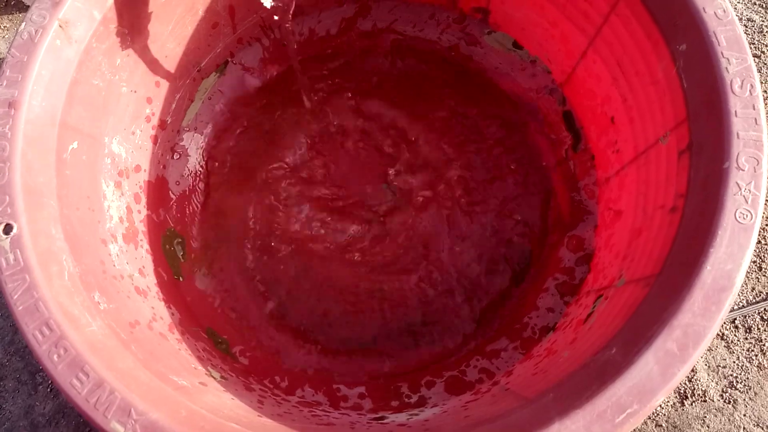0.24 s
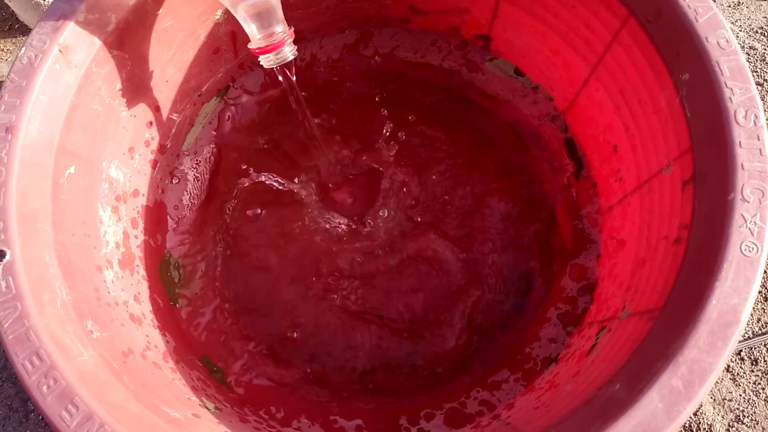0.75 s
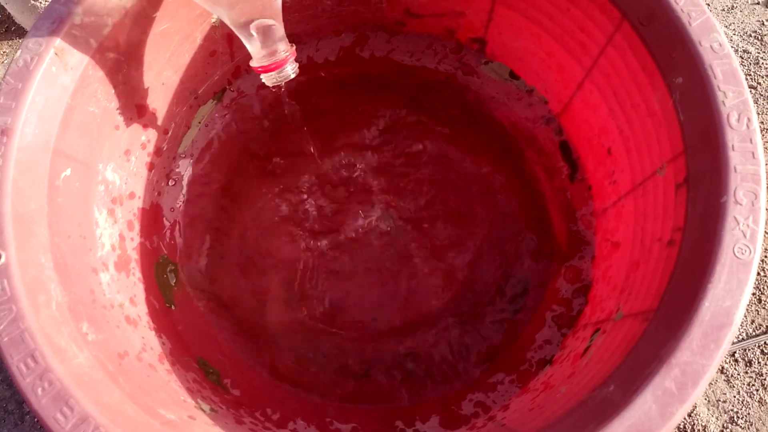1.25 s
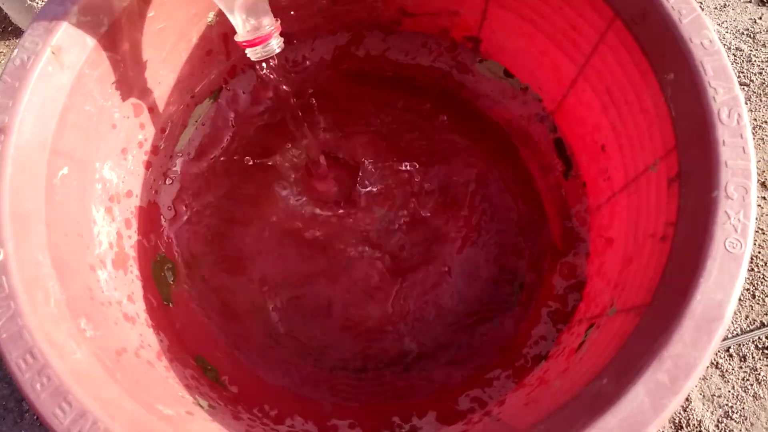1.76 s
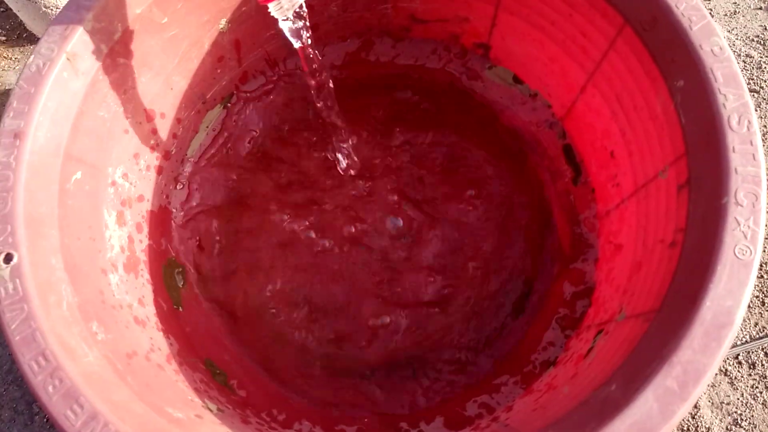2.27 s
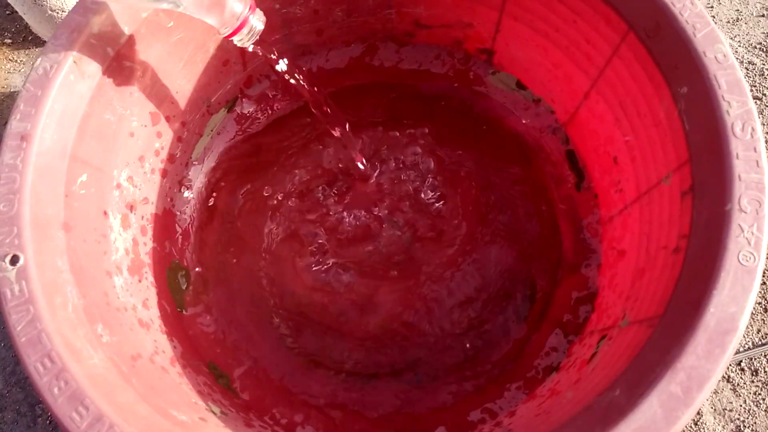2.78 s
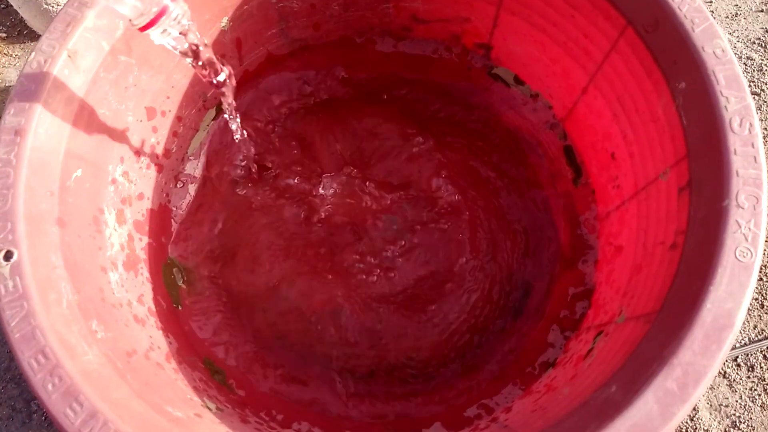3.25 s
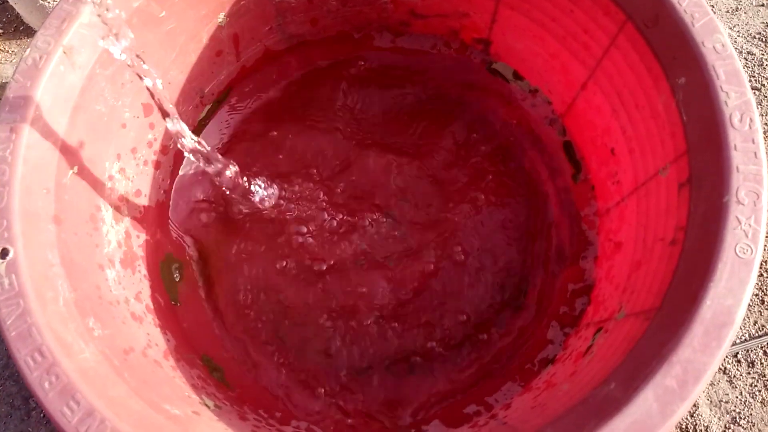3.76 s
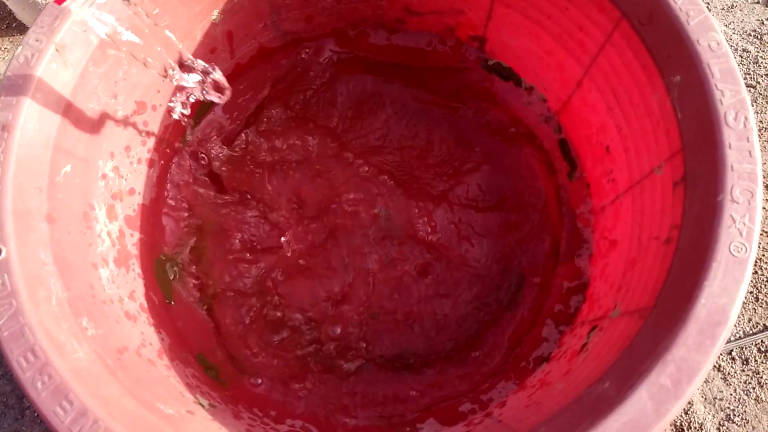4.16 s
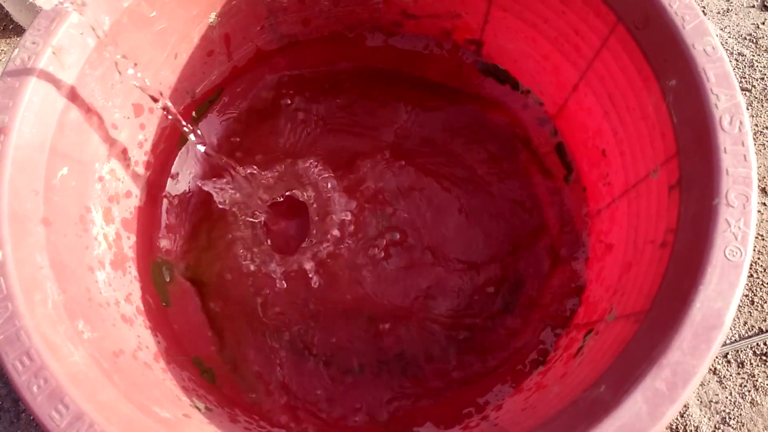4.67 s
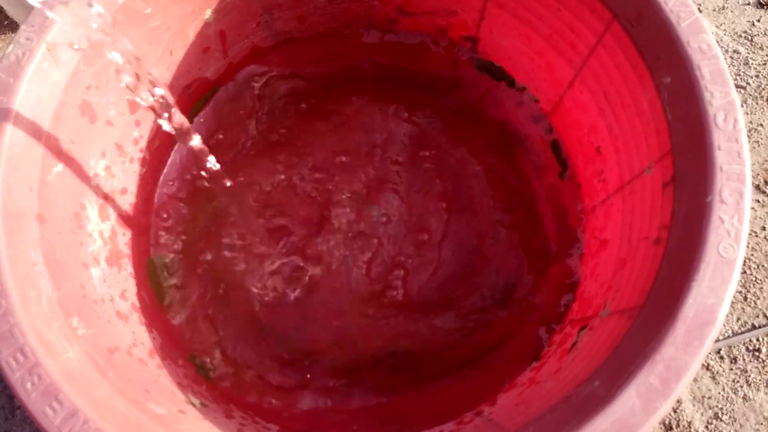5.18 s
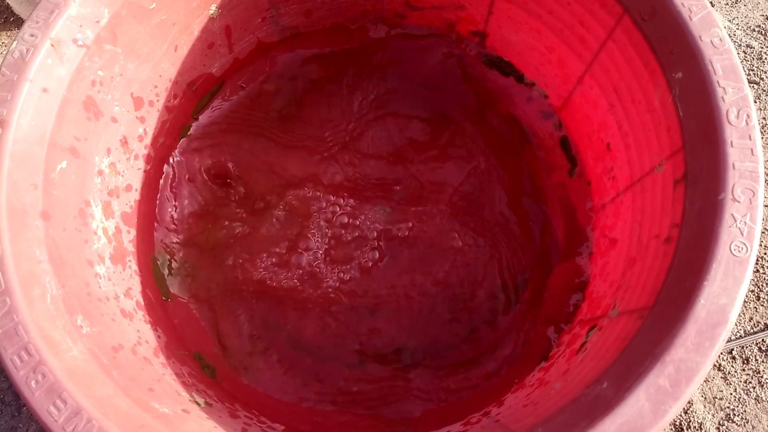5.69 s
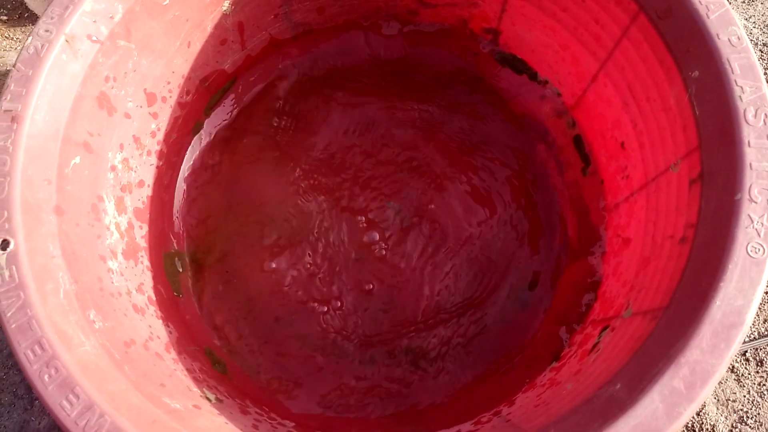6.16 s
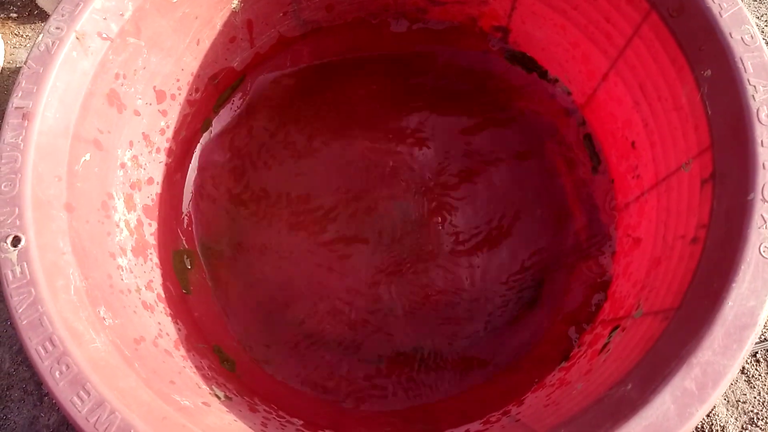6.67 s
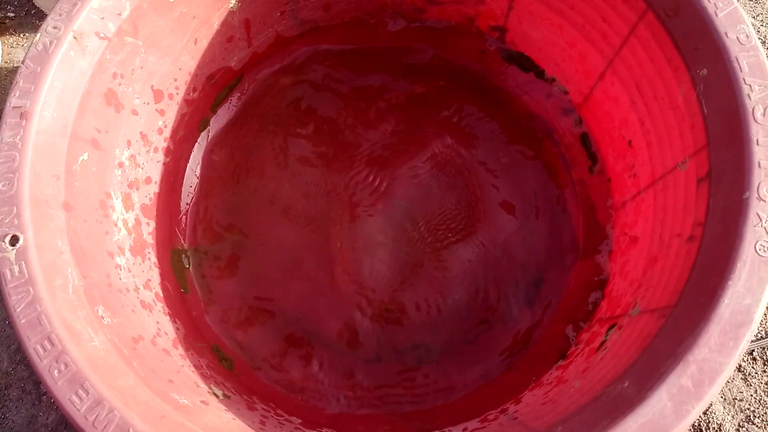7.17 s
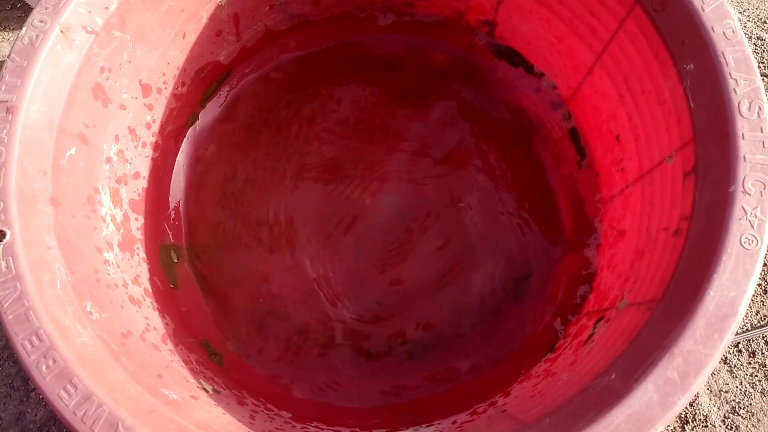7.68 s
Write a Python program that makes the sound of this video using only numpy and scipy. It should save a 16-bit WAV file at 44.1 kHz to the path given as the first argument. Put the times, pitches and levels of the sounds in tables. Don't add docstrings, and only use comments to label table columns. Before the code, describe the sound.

Water glugs from a plastic bottle into a part-full plastic basin, splashing and bubbling, then drips to a stop before one loud hard knock.

```python
import sys
import numpy as np
from scipy import signal
from scipy.fft import rfft, irfft
from scipy.io import wavfile
from scipy.ndimage import uniform_filter1d, map_coordinates

SR = 44100
rng = np.random.default_rng(int(sys.argv[2]) if len(sys.argv) > 2 else 0)


def decibels_to_gain(level_db):
    exponent = np.asarray(level_db, float) / 20
    return 10 ** exponent


def master_out(mix):
    frames = np.transpose(np.atleast_2d(mix))
    ceiling = np.clip(frames, -1, 1)
    pcm = np.round(ceiling * 32767).astype(np.int16)
    wavfile.write(sys.argv[1], SR, pcm)


N = 349536
GRAIN = 4096

# (time [s], peak level [dB], pitch [Hz])
PLOPS = [(0.134, -32, 1370), (0.215, -38, 1110), (0.313, -38.5, 1095), (0.403, -39.5, 1090),
         (0.562, -33, 910), (0.665, -35, 970), (0.949, -36, 1196), (1.118, -37.5, 1070),
         (1.822, -39.5, 825), (2.261, -26.5, 1012), (2.425, -28.5, 1310), (2.641, -35, 1450),
         (2.712, -19, 900), (2.781, -38.5, 580), (3.046, -15.5, 586), (3.261, -33.5, 560),
         (3.389, -24.5, 642), (3.892, -33.5, 1530), (4.235, -34.5, 1070), (4.446, -28.5, 1164),
         (4.755, -30.5, 1290), (4.932, -38, 1490), (5.037, -35.5, 1160), (5.5275, -16.5, 804),
         (5.711, -34, 1083), (6.078, -16, 610), (6.359, -43, 720),
         (0.092, -42.5, 1900), (0.2432, -37.5, 2730), (0.8013, -37.5, 2140), (1.1476, -37.5, 2090),
           (1.4117, -39.5, 1870), (1.4641, -39.5, 1910), (2.0254, -30.5, 1930), (2.1161, -40.5, 1880),
           (2.3228, -39, 2640), (2.6269, -27, 2970), (2.679, -31, 2230), (3.0458, -18.5, 2330),
           (3.05, -17.5, 1660), (3.1804, -25.5, 1920), (3.1977, -28.5, 2145), (3.684, -35.5, 2120),
           (3.4868, -33.5, 1990), (3.5195, -29, 2290), (3.586, -27.5, 2310), (3.9247, -31, 2820),
           (4.1256, -33.5, 2850), (4.279, -31, 2820), (4.3091, -32, 1970), (4.6617, -29, 1930),
           (4.7202, -23, 2220), (4.8522, -30, 1890), (5.0626, -27.5, 2830), (5.447, -27.5, 2640),
           (5.5313, -26, 1990), (6.0779, -31.5, 1735), (6.359, -36.5, 2350),
         (0.6377, -41, 930), (0.8003, -44, 980), (0.8925, -44, 507), (0.9709, -46, 870),
           (1.0697, -45, 1140), (1.36, -44.5, 980), (1.4095, -44, 1460), (3.47, -42.5, 700),
           (3.047, -21, 1100), (2.2358, -42, 955), (2.4489, -38.5, 1350), (2.6836, -40, 646),
           (2.8199, -38, 840), (3.535, -39, 645), (3.7907, -40, 550), (3.8554, -39, 1500),
           (3.9382, -35, 1450), (4.14, -38, 1376), (4.431, -35, 1350), (4.9616, -39.5, 1364),
           (5.278, -39.5, 1380), (5.4804, -39, 1270),
         (0.2115, -37, 1960), (3.608, -34, 2700), (1.1149, -39.5, 1800), (0.707, -39, 2860),
         (1.5041, -39.5, 1850), (5.108, -34.5, 2620), (1.9001, -42.5, 2830), (3.746, -40, 2020),
         (2.5326, -41, 2590), (2.735, -36, 2000), (2.834, -36.5, 2150), (3.0926, -33, 2090),
         (3.305, -39.5, 2100), (3.386, -41, 1660), (3.764, -37.5, 2500), (4.0906, -39, 2610),
         (4.1645, -37.5, 2260), (4.2308, -34, 1586), (4.325, -31.5, 2520), (4.381, -42, 2000),
         (4.3956, -34, 2800), (4.5, -34.5, 2600), (4.643, -33, 2580), (4.963, -39.5, 1655)]


def plops():
    out = np.zeros(N)
    t = np.arange(GRAIN // 2) / SR
    rows = PLOPS
    smack = coloured([(300, 0.5), (600, 9.5), (2600, -0.5), (4500, -12.5), (9000, -76)], N + GRAIN)
    floor_hz, floor_db = 360, -11
    for (s, peak_db, hz), luck in zip(rows, rng.random((len(rows), 3, 10))):
        force = np.clip((peak_db + 39.0) / 30, 0, 1)
        above_oct = 0.313 + force * max(np.log2(2700 / hz), 0)
        cloud = cluster(hz, 0.022 - 0.017 * force, luck, below_oct=0.347, above_oct=above_oct,
                        cycles=64.0, climb=0.05, mates_db=-1.0)
        slap = puff(smack, s, hz, 1.0, skirt_db=-20.5 + 3.4 * force)
        slap = slap * swell(t, 0.009 - 0.00975 * force ** 0.5, 0.038 - 0.0068 * force)
        slap = signal.sosfilt(signal.butter(4, 0.55 * hz, "high", fs=SR, output="sos"), slap)
        splash = (cloud + decibels_to_gain(0.5) * slap) * lozenge(t, 0.0025 * (1.05 - force), 0.016 + 0.015 * force)
        pinched = force ** 2 * decibels_to_gain(5.0) * bubble(t, hz, 24.0, 0.05, rise_cycles=0.68)
        floor = decibels_to_gain(floor_db - 10 * force) * bubble(t, floor_hz, 30.0, 0)
        add(out, s, splash + pinched + floor, peak_db + 0.6)
    return out


# (frequency [Hz], level per Hz [dB])
SPRAY_COLOUR = [(700, -27), (1470, -6), (2710, -2), (3320, -10), (4850, -10), (7030, -9.5), (9880, -7),
                (13500, -11), (14900, -4), (15750, 0.5), (16200, -22.5)]
# (time [s], peak level [dB], centre [Hz])
SLAPS = [(0.1887, -38, 6000), (0.3657, -39.5, 4970), (0.6525, -33.5, 6080), (0.706, -32, 6350),
         (1.6872, -31, 6700), (1.7063, -34, 4130), (1.9734, -41, 5400), (2.257, -27.5, 6680),
         (2.3226, -28, 5870), (2.5266, -32.5, 6250), (2.678, -32, 6240), (2.784, -33, 5940),
         (2.8709, -31.5, 4120), (3.19, -30, 5120), (3.3604, -28.5, 5850), (3.455, -22.5, 4950),
         (3.468, -37, 4600), (3.698, -28, 4390), (3.8578, -37, 3550), (3.925, -30.5, 4410),
         (4.047, -27.5, 4070), (4.1135, -30.5, 6780), (4.14, -32.5, 6030), (4.4037, -33.5, 7100),
         (4.72, -31, 3480), (4.8947, -29, 5770), (4.93, -36, 5130), (5.4067, -33.5, 6070),
         (5.528, -30.5, 4270), (5.6007, -36.5, 3930)]
# (time [s], peak level [dB], centre [Hz])
SPLASHES = [(0.0923, -34, 9900), (0.1345, -27.5, 8400), (0.239, -42, 8100), (0.6449, -36, 15500),
            (0.707, -27.5, 14470), (0.8008, -39, 7340), (0.9466, -26, 8560), (1.1324, -34.5, 8520),
            (1.11, -43, 4600), (1.412, -46.5, 4640), (1.3507, -38, 9800), (1.563, -41, 10000),
            (1.803, -41, 7420), (1.8627, -42.5, 9970), (1.708, -26, 10340), (1.9754, -28, 7560),
            (2.0246, -25, 15500), (2.1945, -36, 10500), (2.4096, -37, 15300), (2.599, -43, 10250),
            (2.8435, -33, 9100), (2.9324, -41.5, 8200), (3.275, -32, 9630), (3.6044, -26, 9700),
            (3.729, -36.5, 9840), (3.8196, -36, 7560), (4.0193, -38, 10800), (4.2, -37, 9780),
            (4.5425, -30.5, 7600), (4.6427, -25.5, 9200), (4.7006, -34.5, 9300), (4.8695, -40, 15900),
            (4.9864, -35, 10140), (5.036, -35, 8550), (5.7108, -42, 7600),
            (0.432, -45.5, 4700), (2.0246, -33, 3870), (2.4095, -37.5, 6030), (2.5499, -38, 6240),
        (2.641, -35.5, 6000), (2.9316, -42, 4150), (3.2767, -39, 3700), (3.6514, -34, 4860),
        (3.8778, -32, 3860), (3.8904, -39, 5580), (5.368, -39, 4800), (5.331, -40.5, 4500),
        (4.2476, -38, 3900), (4.3065, -33, 6230), (4.328, -39, 4250), (4.4185, -35.5, 4030),
        (4.482, -38, 5940), (4.6023, -35.5, 7080), (4.8515, -38, 6800), (4.869, -32.5, 6370),
        (5.441, -35.5, 4160), (5.4873, -38, 5030),
            (0.2056, -38.5, 10750), (2.423, -32.5, 15630), (2.6283, -35, 10220), (3.166, -38, 8000),
          (3.4677, -27, 9440), (3.909, -30, 9540), (3.9593, -42, 15220), (4.0571, -34, 8340),
          (4.088, -39, 8590), (4.1242, -39, 8930), (4.3248, -45, 9730), (4.4825, -27.5, 15610),
          (4.498, -34, 7800), (4.5204, -44, 9810), (4.5741, -33, 15210), (4.657, -31.5, 7900),
          (4.714, -27, 15640), (5.012, -36.5, 8270), (5.1584, -40, 10000), (5.1743, -36, 9230),
          (5.188, -39, 10000), (5.3411, -43, 8320), (5.3853, -43, 10020), (5.4086, -36, 7800),
          (1.267, -41.5, 6200)]
# (time [s], peak level [dB], centre [Hz])
LAST_DRIPS = [(5.624, -46, 4460), (5.71, -32, 3370), (5.7885, -50.5, 6010), (6.063, -47, 9840),
              (6.0785, -37, 14700), (6.199, -47.5, 10800), (6.36, -33, 5200), (6.5345, -55, 9800),
              (6.5993, -37, 11300), (6.171, -51, 9500), (7.013, -47, 5870), (7.0374, -48, 6500),
              (7.065, -44, 10270), (7.332, -45.5, 6700), (7.346, -41, 6740), (7.611, -53, 8050)]


def rebounds():
    rows = []
    for (s, db, hz), (late, weak, size) in zip(SLAPS, rng.random((len(SLAPS), 3))):
        rows.append((s + 0.012 + 0.0049 * late, db - 14.5 - 3.4 * weak, hz * (0.6 + 0.415 * size)))
    return rows


def ticks():
    out = np.zeros(N)
    t = np.arange(GRAIN // 2) / SR
    spray = coloured(SPRAY_COLOUR, N + GRAIN)
    drips = [(s, db - 4.5, hz) for s, db, hz in LAST_DRIPS]
    rows = SLAPS + SPLASHES + rebounds() + drips
    for (s, peak_db, hz), luck in zip(rows, rng.random((len(rows), 3, 8))):
        brief = np.clip(0.75 - 0.0397 * (peak_db + 30), 0.3, 1)
        mist = puff(spray, s, hz, 0.38, skirt_db=-11 + 0.5 * (peak_db + 30))
        mist = decibels_to_gain(0.5) * mist * (swell(t, 0.0005, 0.04 * brief) + 0.1 * swell(t, 0.00337, 0.086))
        cloud = cluster(hz, 0.006 * brief, luck, below_oct=0.4, above_oct=0.4,
                        cycles=90 * brief, climb=0.03, mates_db=-3)
        add(out, s, (mist + cloud) * lozenge(t, 0.001, 0.011 * brief), peak_db + 1.5)
    return out


# (time [s], peak level [dB], pitch [Hz])
THUMPS = [
    (0.9, -33.5, 190),
    (1.351, -36.5, 360),
    (2.711, -32, 214),
    (3.045, -31, 200),
    (4.753, -34, 370),
    (5.526, -27.5, 149),
    (6.075, -34, 146),
    (6.354, -35, 173),
]
# (time [s], peak level [dB], pitch [Hz])
FLEXES = [(0.1385, -40.5, 360), (0.892, -37.5, 376), (2.2592, -46, 360), (2.504, -42, 280),
          (2.7101, -36.5, 360), (2.7914, -47, 338), (3.381, -43, 420), (3.5855, -43.5, 340),
          (3.7463, -48.5, 373), (3.9457, -45, 366), (4.12, -44.5, 350), (4.8534, -42.5, 379)]


def thumps():
    out = np.zeros(N)
    t = np.arange(GRAIN) / SR
    for s, peak_db, hz in THUMPS:
        add(out, s, swell(t, 0.00065, 11.3 / hz) * np.sin(2 * np.pi * hz * t), peak_db)
    for s, peak_db, hz in FLEXES + [(4.45, -39.5, 384)]:
        add(out, s, swell(t, 0.008, 28.0 / hz) * np.sin(2 * np.pi * hz * t), peak_db)
    return out


# (time [s], peak level [dB], t60 [s])
SURGES = [(0.239, -29, 0.13), (0.556, -35, 0.055), (2.785, -33.5, 0.34), (3.349, -25.5, 0.065),
          (3.508, -32, 0.11), (4.235, -37, 0.15), (4.394, -29.5, 0.29), (4.428, -39.5, 0.34),
          (4.752, -26, 0.16), (5.029, -32, 0.73), (5.277, -41, 0.26)]


def surge():
    t = np.arange(N) / SR
    return sum(decibels_to_gain(peak_db - 9.5) * swell(t - s, 0.0079, np.clip(t60, 0.08, 0.6)) for s, peak_db, t60 in SURGES)


# (time [s], flow level [dB], break-up into spray [dB], share of big deep bubbles [dB])
STREAM = [(0.0, -77.5, 5.5, 4), (0.34, -58, -10, 0), (0.51, -66, -7, 2), (1.05, -54.5, -14.5, 0),
          (1.31, -50, -22.5, -7), (1.92, -57, -11.5, -5), (2.24, -56.5, -10, 6), (2.77, -56, -6.5, 1),
          (3.08, -56, -11.5, 1), (3.56, -46.5, -10.5, 10), (4.06, -55.5, -1, -5), (4.33, -65, 4, -12),
          (4.65, -61, 4, -10), (4.8, -53.5, -5.5, 10), (5.03, -65.5, -2.5, 3), (5.19, -51.5, -24, 1),
          (5.39, -47, -6, -7), (5.56, -47.5, -12, 4)]
STREAM_FADE_S = 0.082
# (start time [s], length [s])
GURGLE_GAPS = [(0.103, 0.027), (0.346, 0.02), (0.478, 0.038), (0.907, 0.031), (1.303, 0.03), (1.937, 0.045),
               (2.005, 0.032), (2.357, 0.03), (3.43, 0.036), (3.829, 0.023), (3.87, 0.022), (3.977, 0.028),
               (4.206, 0.024), (4.304, 0.049), (4.586, 0.035)]
# (start time [s], length [s])
SPRAY_GAPS = [(0.082, 0.023), (0.28, 0.041), (0.336, 0.024), (0.567, 0.042), (0.893, 0.046), (1.204, 0.023),
              (1.583, 0.033), (1.632, 0.032), (1.747, 0.035), (1.919, 0.044), (2.081, 0.023),
              (2.161, 0.033), (2.339, 0.034), (2.694, 0.034), (2.734, 0.027), (3.014, 0.023), (3.427, 0.02),
              (3.736, 0.029), (3.978, 0.028), (4.672, 0.043), (4.828, 0.037), (4.9, 0.038), (5.266, 0.054),
              (5.529, 0.038)]


def churn():
    stream_end = (STREAM[-1][0] + STREAM_FADE_S, -120, 0, 0)
    gurgle_db, breakup_db, deep_db = in_time(STREAM + [stream_end])
    burst = surge()
    gurgle_gain = decibels_to_gain(gurgle_db - 4.0) + burst
    spray_gain = decibels_to_gain(gurgle_db + breakup_db + 2.0) + decibels_to_gain(-7.5) * burst
    slosh_gain = decibels_to_gain(-59.0) * (gurgle_db > -110) + decibels_to_gain(-8.0) * burst

    slosh = swarm(320, [(280, -15), (360, 11.5), (480, -7.5)], 296.0, 476, cycles=18.3, size_db=0.0, clump_db=2.0)
    gurgle_colour = [(500, -14), (1000, -2), (1200, 1.5), (2700, 1), (3300, -18)]
    gurgle = swarm(1900, gurgle_colour, 520, 3200, cycles=45, size_db=2.5, clump_db=1.5)
    rush_colour = [(550, -32), (900, -5.5), (1300, -4.5), (2500, -6.0), (3400, -32.0)]
    gurgle = gurgle + decibels_to_gain(-5.5 + 3.6 * drift(14)) * coloured(rush_colour, N)
    deep = signal.sosfilt(signal.butter(4, 990, fs=SR, output="sos"), gurgle)
    gurgle = gurgle + (decibels_to_gain(deep_db) - 1) * deep

    patter = swarm(2000, SPRAY_COLOUR, 3300, 15870, cycles=98, size_db=6.0, clump_db=4.5)
    mist = coloured(SPRAY_COLOUR, N)
    coarse = signal.sosfilt(signal.butter(4, 6500, fs=SR, output="sos"), mist)
    mist = decibels_to_gain(3.0) * (spatter() * coarse + spatter() * (mist - coarse))
    spray = decibels_to_gain(-2.0) * patter + mist
    return slosh_gain * slosh + gaps(GURGLE_GAPS) * gurgle_gain * gurgle + gaps(SPRAY_GAPS) * spray_gain * spray


def spatter():
    drops_per_s, t60_s = 100, 0.023
    lands = rng.random(N) < drops_per_s * decibels_to_gain(4.0 * drift(6)) / SR
    drops = decibels_to_gain(5.4 * np.minimum(rng.exponential(1, N), 2.4)) * lands
    return rms_one(0.17 + signal.lfilter([1], [1, -decibels_to_gain(-60 / (t60_s * SR))], drops))


def gaps(rows):
    shut = np.clip(sum(spell(s, length_s, 0.006) for s, length_s in rows), 0, 1)
    return 1 - (1 - decibels_to_gain(-10)) * shut


# (time [s], level [dB], t60 [s])
FOAM_STIRS = [
    (5.6, -67, 3),
    (6.37, -78, 0.8),
    (6.789, -32, 0.036),
    (6.8, -56, 1.2),
    (7.325, -60, 0.11),
]


def foam():
    t = np.arange(N) / SR
    gain = sum(decibels_to_gain(level_db) * swell(t - s, 0.00293, t60) for s, level_db, t60 in FOAM_STIRS)
    gain = gain * (1 - spell(7.09, 0.221, 0.02))
    colour = [(4000, -0.5), (7500, -12), (10000, 0.0), (12500, -13.5), (15500, -8.5)]
    return gain * swarm(9000, colour, 4200, 15500, cycles=120, size_db=2.5, clump_db=4.0)


# (frequency [Hz], width [Hz], level [dB])
BASIN_MODES = [(2064, 90, -5), (2672, 90, -4), (3840, 190, -5), (4775, 340, -0.5), (6080, 200, 3),
               (7560, 90, -0.5), (8130, 60, -2.5), (9950, 300, 1)]


def basin(x, ring_db):
    out = x.copy()
    for hz, width_hz, level_db in BASIN_MODES:
        r = np.exp(-np.pi * width_hz / SR)
        poles = [1, -2 * r * np.cos(2 * np.pi * hz / SR), r * r]
        zeros = np.array([1, 0, -1]) * (1 - r * r) / 2
        out += decibels_to_gain(ring_db + level_db) * signal.lfilter(zeros, poles, x)
    return out


def room(x):
    t = np.arange(SR // 2) / SR
    colour = [(60, 3.5), (1500, -2.5), (6000, -7.0), (17000, -42.5)]
    echo = coloured(colour, len(t)) * swell(t - 0.006, 0.0032, t60=0.091)
    return signal.fftconvolve(x, echo / np.sqrt(np.sum(echo ** 2)))[:N]


# (frequency [Hz], level [dB], t60 [s])
KNOCK_MODES = [(116, 0.5, 4.6), (207.4, 0.5, 0.5), (360, -18, 5.0), (724, 7, 0.28), (1342, -8, 0.96),
               (2140, -12, 0.35), (2500, -6.5, 0.29)]
# (frequency [Hz], level per Hz [dB])
CRACK_COLOUR = [(280, -23), (509, -12.5), (1190, 0), (1520, -3.5), (2830, 2), (4330, -11.5), (5790, -9),
                (15100, -32.5), (16500, -42.5)]
# (frequency [Hz], level per Hz [dB])
WASH_COLOUR = [(80, -56), (117, -9.5), (273, -19.5), (436, -15), (498, -22.5), (711, -19.5), (2370, -20.5),
               (15100, -55.5), (16500, -44.5)]


def knock():
    out = np.zeros(N)
    t = np.arange(SR // 2) / SR
    rings = 0
    for hz, level_db, t60 in KNOCK_MODES:
        rings += decibels_to_gain(level_db) * swell(t, 0.002, min(t60, 0.06 + 100 / hz)) * np.sin(2 * np.pi * hz * t)
    crack = coloured(CRACK_COLOUR, len(t)) * swell(t, 0.00071, 0.053)
    wash = coloured(WASH_COLOUR, len(t)) * swell(t, 0.0074, 0.45) * decibels_to_gain(2.0 * drift(36.7)[:len(t)])
    wash = wash / (1 + (t / 0.54) ** 12)
    fizz = coloured([(9000, -3.0), (12500, -6.0), (15500, -7), (16300, -29.5)], len(t))
    wash = wash + decibels_to_gain(-29.5) * fizz / (1 + (t / 0.19) ** 16)
    bang = crack + decibels_to_gain(-17.0) * wash + decibels_to_gain(-24.0) * rings
    add(out, 6.789, np.tanh(0.5 * bang), peak_db=-4)
    return out


# (time [s], level [dB])
LET_THROUGH = [(0, -0.5), (.7, 2.5), (1.2, 1.5), (1.7, -2.5), (2.7, -3), (3.9, -7.5), (4.5, -10.5),
               (5.66, -8), (5.76, 2), (6.8, 2), (7.93, 1.5)]
# (start time [s], length [s], level [dB])
HUM_SPELLS = [(0.067, 0.27, -48.5), (0.477, 0.38, -46.5), (1.05, 0.31, -44.5), (1.539, 0.28, -44.5),
              (1.974, 0.25, -42), (2.41, 0.19, -45), (2.79, 0.18, -50), (3.417, 0.314, -58),
              (4.146, 0.15, -60), (5.737, 1.3, -66.5), (6.804, 1.3, -57.5)]


def hum():
    hum_hz = 183.5
    through_db, = in_time(LET_THROUGH)
    gain = decibels_to_gain(-54 + through_db) + sum(decibels_to_gain(db) * spell(s, length_s, 0.035) for s, length_s, db in HUM_SPELLS)
    tone = 0.4 * waver(hum_hz, width_hz=34) + 1.2 * np.sin(2 * np.pi * hum_hz * np.arange(N) / SR)
    undertone = decibels_to_gain(-62 + 1.6 * through_db) * waver(117, width_hz=10)
    return gain * tone + undertone


# (start time [s], length [s], level [dB])
THROB_LUMPS = [
    (0.198, 0.09, -48),
    (0.367, 0.13, -46),
    (0.624, 0.095, -45),
    (0.81, 0.09, -48),
    (1.28, 0.12, -55),
    (2.04, 0.055, -54),
]
# (frequency [Hz], level per Hz [dB])
AIR_COLOUR = [(25, -30), (50, -10), (100, -7.5), (210, -5), (290, -17), (450, -16.5), (700, -26),
              (1100, -62.5)]
# (frequency [Hz], level per Hz [dB])
HISS_COLOUR = [(350, -27), (600, -3.5), (897, -5), (1250, -5), (2430, -3.5), (3170, -14.5), (3490, -19),
               (6790, -38), (15200, -48.5), (16500, -41)]


def background():
    through_db, = in_time(LET_THROUGH)
    t = np.arange(N) / SR
    throb = decibels_to_gain(-64 + 1.5 * through_db) * waver(71.6, width_hz=25)
    lumps = sum(decibels_to_gain(db) * spell(s, length_s, 0.046) for s, length_s, db in THROB_LUMPS)
    throb = throb + lumps * np.sin(2 * np.pi * 67 * t + 0.79 * drift(9))
    air = decibels_to_gain(-51 + 1.22 * through_db) * coloured(AIR_COLOUR, N)
    water_runs = np.arange(N) < STREAM[-1][0] * SR
    hiss_db = -60 + 1.1 * through_db - 3 * water_runs
    hiss = gaps(GURGLE_GAPS) * decibels_to_gain(hiss_db) * coloured(HISS_COLOUR, N)
    return throb + air + hiss


# (time [s], length [s], level [dB], pitch [Hz])
HOOTS = [
    (6.245, .045, -58, 970),
    (6.369, 0.028, -54, 970),
    (6.552, 0.02, -59, 894),
]


def hoots():
    t = np.arange(N) / SR
    return sum(decibels_to_gain(level_db) * spell(s, length_s, 0.013) * np.sin(2 * np.pi * hz * t)
               for s, length_s, level_db, hz in HOOTS)


def noise_control(x, depth_db, patch_hz, patch_s):
    size, hop = 512, 128
    cells = signal.stft(x, nperseg=size, noverlap=size - hop)[2]
    patches = rng.standard_normal(cells.shape)
    for _ in range(2):
        patches = uniform_filter1d(patches, max(round(patch_hz * size / SR), 1), axis=0)
        patches = uniform_filter1d(patches, max(round(patch_s * SR / hop), 1), axis=1)
    gain = decibels_to_gain(depth_db * patches / patches.std())
    gain = gain / np.sqrt(np.mean(gain ** 2))
    return signal.istft(cells * gain, nperseg=size, noverlap=size - hop)[1][:N]


def bubble(t, hz, cycles, climb, rise_cycles=1.22):
    t = np.maximum(t, 0)
    t60 = np.minimum(cycles / hz, 0.034)
    return swell(t, rise_cycles / hz, t60) * np.sin(2 * np.pi * hz * t * (1 + climb * np.minimum(t / t60, 1)))


def cluster(hz, length_s, luck, below_oct, above_oct, cycles, climb, mates_db):
    t = np.arange(GRAIN // 2) / SR
    pitch, born, size = luck
    mates_hz = np.clip(hz * 2 ** ((below_oct + above_oct) * pitch - below_oct), 200, 16000)
    sizes = decibels_to_gain(mates_db - 23.5 * size - 10.0 * born)
    mates = bubble(t[:, None] - length_s * born ** 2, mates_hz, cycles, climb) @ sizes
    return bubble(t, hz, cycles, climb) + mates


def swarm(per_s, spectrum, low_hz, high_hz, cycles, size_db, clump_db):
    sizes = decibels_to_gain(size_db * np.minimum(rng.exponential(1, N), 4)) * rng.choice([-1, 1], N)
    born = rng.random(N) < per_s * decibels_to_gain(clump_db * (drift(20) + drift(70))) / SR
    out = np.zeros(N)
    dealt = rng.integers(0, 24, N)
    for k, hz in enumerate(np.geomspace(low_hz, high_hz, 24)):
        r = decibels_to_gain(-60 * hz / (cycles * SR))
        w = 2 * np.pi * hz / SR
        gain = hz * decibels_to_gain(level_at(spectrum, hz)) * np.sin(w)
        out += signal.lfilter([0, gain], [1, -2 * r * np.cos(w), r * r], sizes * born * (dealt == k) + 1e-18)
    return rms_one(out)


def puff(noise, s, hz, width_oct, skirt_db):
    grid = np.fft.rfftfreq(GRAIN // 2, 1 / SR) + 1
    lift = decibels_to_gain(skirt_db) + np.exp(-(np.log2(grid / hz) / width_oct) ** 2)
    piece = noise[round(s * SR):][:GRAIN // 2]
    return rms_one(irfft(rfft(piece) * lift, GRAIN // 2))


def coloured(spectrum, size):
    gain = decibels_to_gain(level_at(spectrum, np.fft.rfftfreq(size, 1 / SR)))
    return rms_one(irfft(rfft(rng.standard_normal(size)) * gain, size))


def waver(hz, width_hz):
    band = signal.butter(2, [hz - width_hz / 2, hz + width_hz / 2], "band", fs=SR, output="sos")
    return rms_one(signal.sosfilt(band, rng.standard_normal(N + SR))[SR:])


def drift(rate):
    knots = rng.standard_normal(1000)
    return map_coordinates(knots, [np.arange(N) / SR * rate * 2 % 990], order=3)


def swell(t, rise_s, t60):
    t = np.maximum(t, 0)
    return (1 - np.exp(-t / rise_s)) * decibels_to_gain(-60 * t / t60)


def lozenge(t, rise_s, fall_s):
    return (1 - np.exp(-(t / rise_s) ** 2)) * (0.1 + np.exp(-(t / fall_s) ** 2))


def spell(start_s, length_s, edge_s):
    t = np.arange(N) / SR - start_s
    return np.sin(np.pi / 2 * np.clip(np.minimum(t, length_s - t) / edge_s + 0.5, 0, 1)) ** 2


def add(out, s, grain, peak_db):
    i = round(s * SR)
    grain = grain[:N - i]
    out[i:i + len(grain)] += decibels_to_gain(peak_db) * grain / (np.abs(grain).max() + 1e-12)


def in_time(rows):
    s, *columns = np.transpose(rows)
    return [np.interp(np.arange(N) / SR, s, c) for c in columns]


def level_at(spectrum, hz):
    points_hz, level_db = np.transpose(spectrum)
    return np.interp(np.log(np.maximum(hz, 1)), np.log(points_hz), level_db)


def rms_one(x):
    return x / np.sqrt(np.mean(x ** 2, axis=-1, keepdims=True) + 1e-20)


def scene():
    stream = noise_control(churn() + foam(), depth_db=4.5, patch_hz=300, patch_s=0.035)
    water = basin(plops() + ticks() + stream, ring_db=0) + thumps()
    bed = noise_control(background(), depth_db=2, patch_hz=200, patch_s=0.03) + hum() + hoots()
    return (water + decibels_to_gain(-20) * room(water) + knock() + bed)[None]


def roll_off(x):
    return signal.sosfilt(signal.butter(12, 17140, fs=SR, output="sos"), x)


def record(dry):
    dip_hz, dip_width_hz, dip_share = 12900, 2600, 0.65
    dip = signal.iirpeak(dip_hz, dip_hz / dip_width_hz, fs=SR)
    dipped = dry - dip_share * signal.lfilter(*dip, dry)
    bass_cut = signal.butter(4, 51, "high", fs=SR, output="sos")
    top_cut = signal.cheby2(12, 24, 16050, fs=SR, output="sos")
    mix = signal.sosfilt(np.vstack([bass_cut, top_cut]), dipped)
    return roll_off(mix)


dry = scene()
out = record(dry)
master_out(out)
```